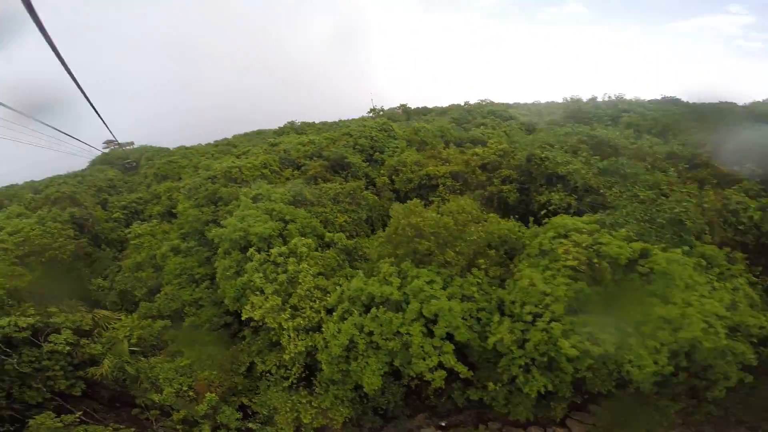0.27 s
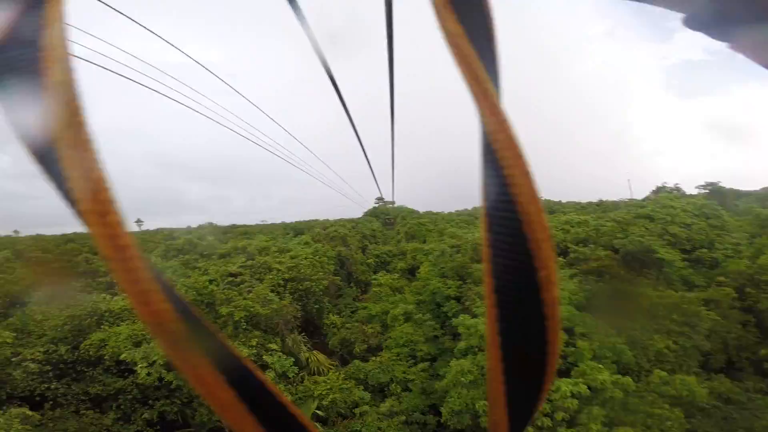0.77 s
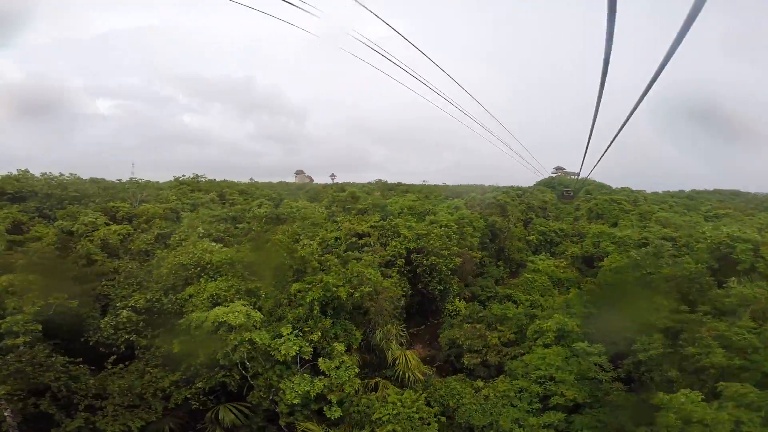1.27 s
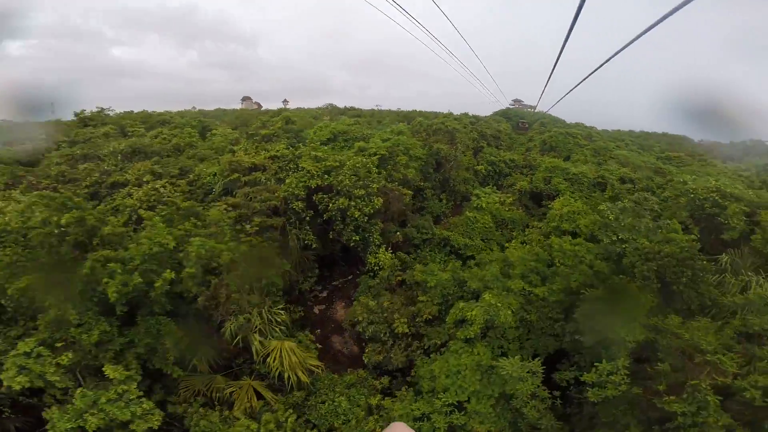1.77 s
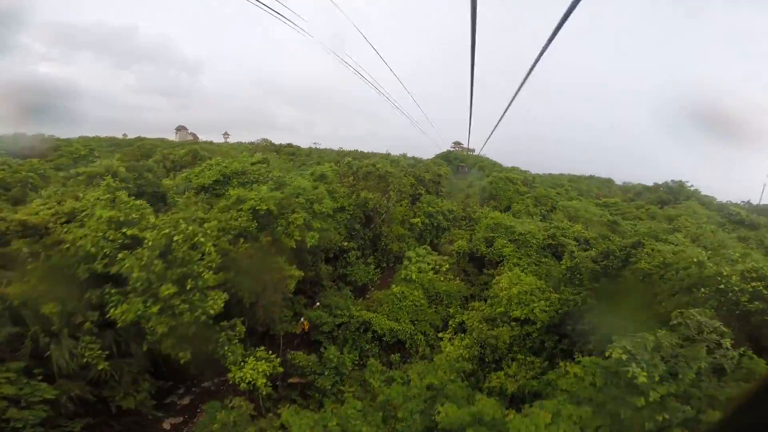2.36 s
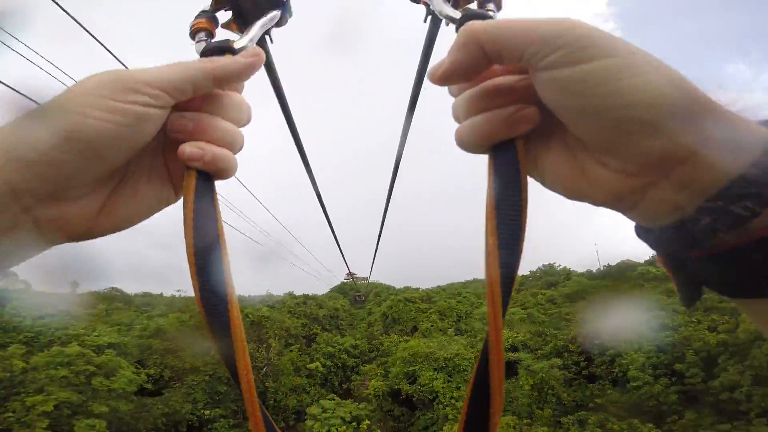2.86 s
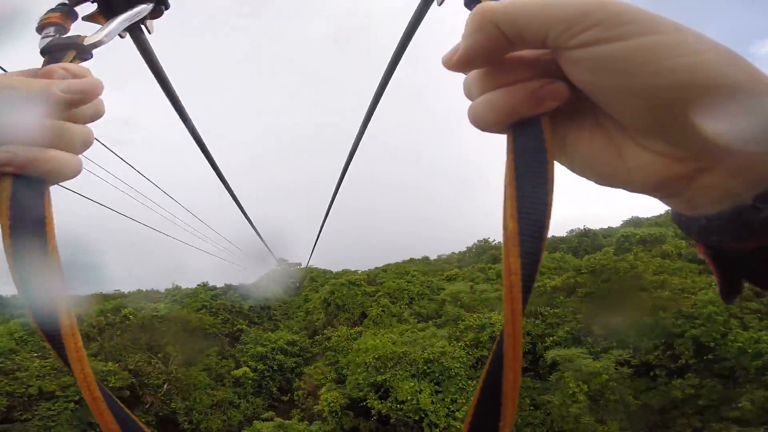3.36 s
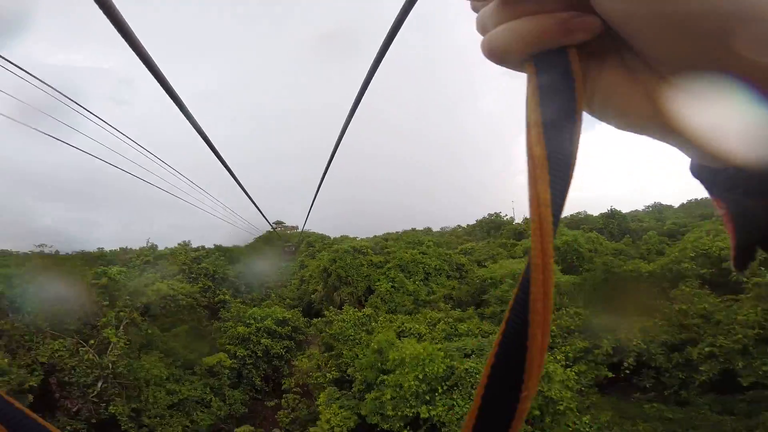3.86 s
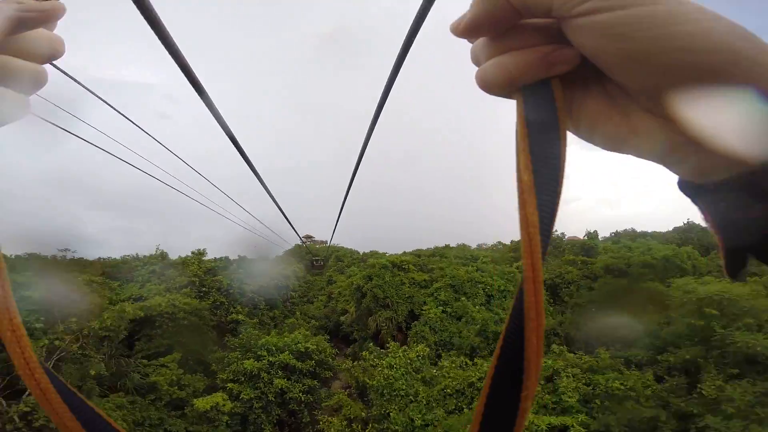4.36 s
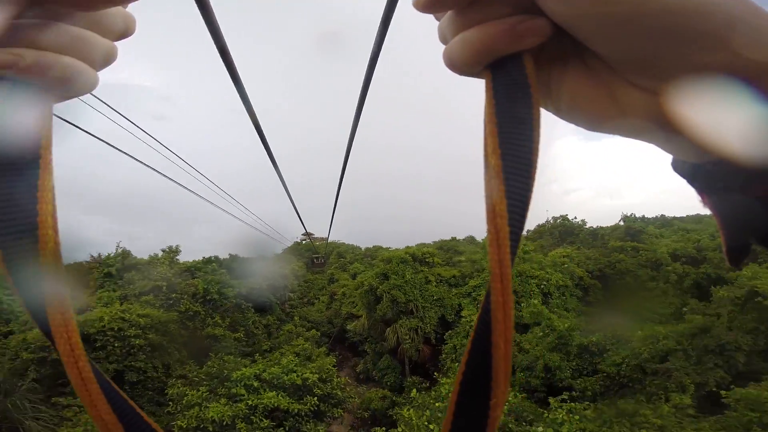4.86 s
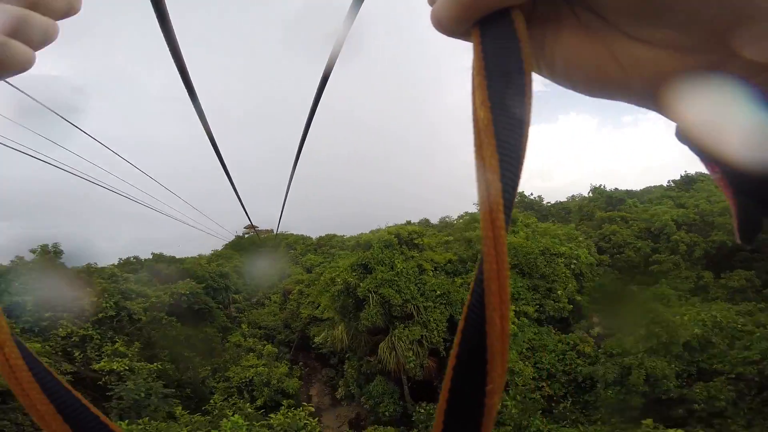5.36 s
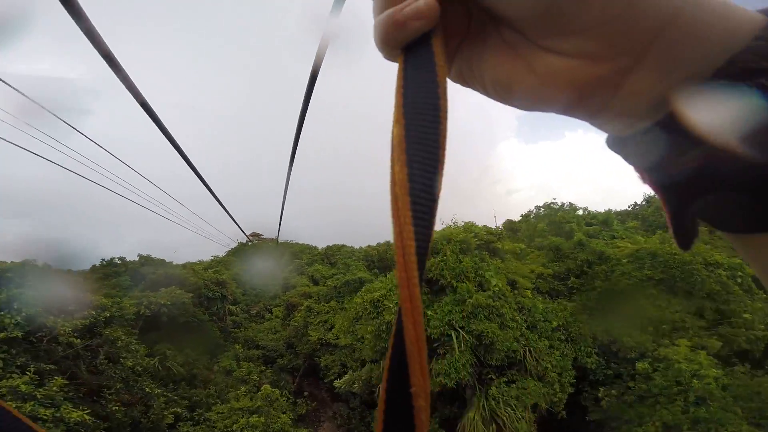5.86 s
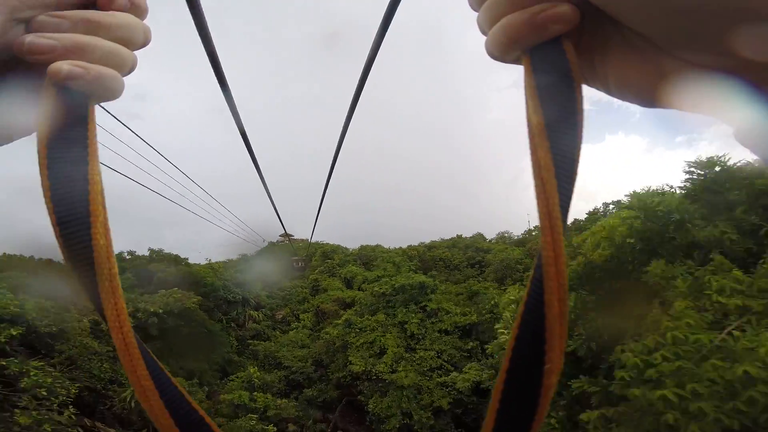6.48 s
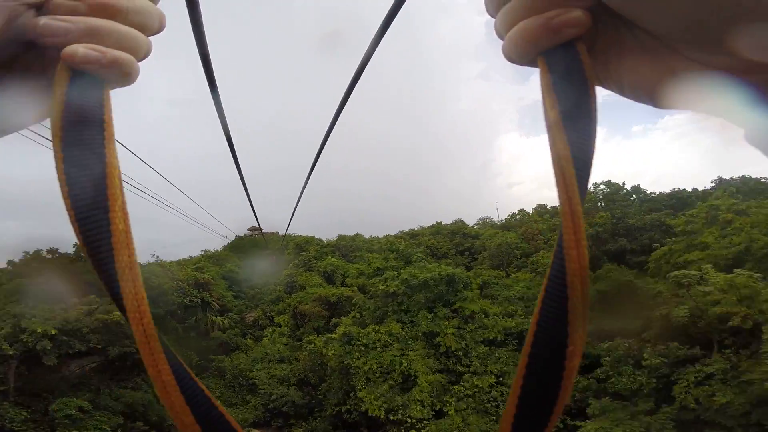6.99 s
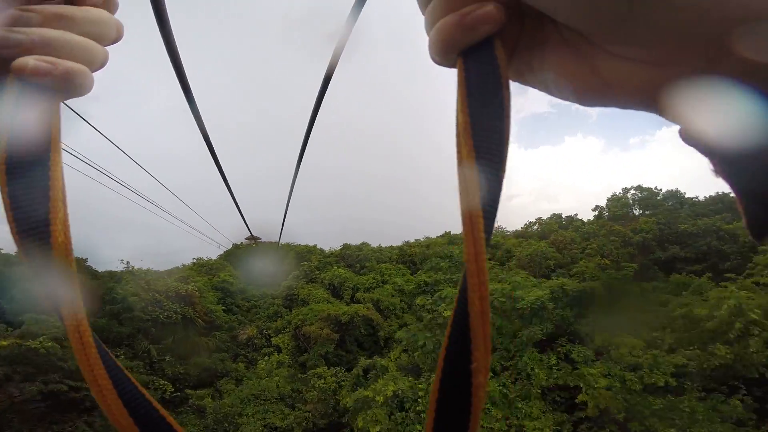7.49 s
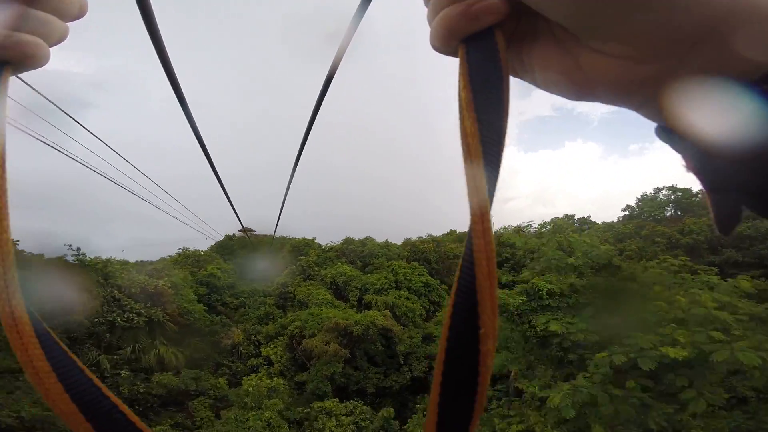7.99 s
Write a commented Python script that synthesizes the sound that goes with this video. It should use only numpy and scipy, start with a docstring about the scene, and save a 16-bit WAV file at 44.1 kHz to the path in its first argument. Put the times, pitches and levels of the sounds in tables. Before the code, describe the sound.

A zip line trolley whines and hisses steadily along a steel cable, its pitch slowly sinking, with soft wind gusts and one strap knock early on.

```python
"""High on a zip line: a trolley runs down a stranded steel cable, heard from a camera on the rider, and slows.
The sheaves hum over the strands, two bearing whistles sing as partials, and filtered noise through steel
resonances makes the rolling ring, hiss and sizzle; its colour changes as the rider twists.
Gusts of low buffet and airy rush reach the microphone, and a harness strap knocks against the camera once,
as short bursts of noise through the housing."""
import sys
import numpy as np
from scipy import signal
from scipy.fft import rfft, irfft, next_fast_len
from scipy.io import wavfile
from scipy.ndimage import uniform_filter1d, minimum_filter1d

SR = 44100
rng = np.random.default_rng(int(sys.argv[2]) if len(sys.argv) > 2 else 0)


def waveform_to_disk(signal):
    """Save audio, clipped to [-1, 1], as 16-bit WAV at the path in sys.argv[1]."""
    frames = np.transpose(np.atleast_2d(signal))
    scaled = np.clip(frames, -1, 1) * 32767
    samples = np.round(scaled).astype(np.int16)
    wavfile.write(sys.argv[1], SR, samples)


N = 362502
TIME = np.arange(N) / SR  # s
SIZE = next_fast_len(N + 8192, real=True)  # transform length, with room for filter tails
FREQ = np.arange(SIZE // 2 + 1) * SR / SIZE  # Hz


def undb(db):
    """Decibels to gain."""
    return 10 ** (np.asarray(db) / 20)


def unit(x):
    """Scale to rms 1."""
    return x / np.sqrt(np.mean(x ** 2) + 1e-18)


def curves(table):
    """Each column of a table of timed rows, sample by sample."""
    s, *columns = np.transpose(table)
    return [np.interp(TIME, s, column) for column in columns]


def swells(table):
    """Bell-shaped changes in dB, summed over the events; one curve for each dB column."""
    total = 0
    for s, half, *rises in table:
        bell = np.exp(-((TIME - s) / half) ** 2)
        total = total + np.outer(rises, bell)
    return total


def walk(rate):
    """Smooth random wander with spread 1, from steps drawn at the given rate per s."""
    k = max(int(SR / rate), 1)
    steps = np.repeat(rng.standard_normal(N // k + 1), k)
    smooth = uniform_filter1d(uniform_filter1d(steps, k), k)
    return unit(smooth[:N])


def shape(x, gain):
    """Causal (minimum-phase) filter with the given gain at every frequency."""
    cepstrum = irfft(np.log(gain + 1e-6), SIZE)
    # fold the cepstrum forward in time so nothing sounds before its cause
    cepstrum[1:SIZE // 2] *= 2
    cepstrum[SIZE // 2 + 1:] = 0
    response = np.exp(rfft(cepstrum))
    return irfft(rfft(x, SIZE) * response, SIZE)[:N]


def colour(points):
    """Gain through (f/Hz, level/dB) points, falling away above the last."""
    hz, db = np.transpose(points)
    curve_db = np.interp(np.log(FREQ + 1), np.log(hz), db)
    return undb(curve_db) / (1 + (FREQ / hz[-1]) ** 4)


def resonances(modes):
    """Gain of a body with steep (f/Hz, width/Hz, level/dB) resonances, summed as power."""
    power = 0
    for hz, width, db in modes:
        power = power + (undb(db) / (1 + (2 * (FREQ - hz) / width) ** 2)) ** 2
    return np.sqrt(power)


def band_rms(x, lo_hz, hi_hz):
    """Level of a sound between two frequencies."""
    band = signal.butter(4, [lo_hz, hi_hz], "band", fs=SR, output="sos")
    return np.std(signal.sosfilt(band, x))


# the trolley's pace as it slows
# [t/s, f/Hz at which the sheaves cross the cable strands]
STRAND_RATE = [(0.0, 667), (1.3, 671.7), (2.4, 656.8), (3.4, 646), (4.1, 636.0), (5.2, 627.3), (6.4, 609),
               (7.3, 589), (8.22, 574.2)]


def strand_rate(wobble=0.0017):
    """Rolling speed over strand spacing sets the crossing rate, with a slight random wobble."""
    return curves(STRAND_RATE)[0] * (1 + wobble * walk(12))


def contact(strand_phase, grit_db, flutter_db, flutter_rate, strand_db):
    """Countless tiny steel-on-steel impacts; the load flutters and pulses with the given phase."""
    load_db = grit_db * walk(900) + flutter_db * walk(flutter_rate)
    load_db = load_db + strand_db * np.sin(strand_phase)
    return unit(rng.standard_normal(N) * undb(load_db))


# the rider's twist
# [t/s, side: 0 sideways, 1 twisted away, 2 ahead]
TWIST = [(0, 0), (.84, 0), (1.0, 1), (2.45, 1), (3.05, 2), (8.22, 2)]


def ring(drive, modes, lo_hz, hi_hz):
    """The contact rings a group of resonances; the twist blends three sides, each levelled in the given band."""
    side, = curves(TWIST)
    out = 0
    for index in range(3):
        heard = shape(drive, resonances(modes[:, [0, 1, 2 + index]]))
        share = np.maximum(1 - abs(side - index), 0)
        out = out + share * heard / band_rms(heard, lo_hz, hi_hz)
    return out


# steel resonances and their strength from each side
# [f/Hz, width/Hz, level/dB sideways, level/dB twisted away, level/dB ahead]
TROLLEY = [(1258, 206, -31, -38, -27.5), (1547, 184, -18, -23, -17.5), (1700, 240, -17.5, -20.5, -19),
           (1893, 81, -16.5, -17, -16), (2520, 1000, -24.5, -22, -23.5), (2679, 196, -13, -36.5, -12.5),
           (3010, 260, -8.5, -8, -8), (3160, 72, -26, -6.5, -7.5), (3473, 142, 0.5, 0.5, 1.5),
           (3665, 232, -3.5, 1, 0), (4380, 38, 0.5, -5, -42), (4680, 650, -10, -10.5, -13),
           (5280, 260, -11, -8, -12.5), (5630, 330, -4, -3, -10), (6062, 340, -3, -10, -4.5),
           (6302, 454, 2, -4.5, -4), (6940, 66, -21, -8, -4), (7017, 164, -16, -32, -8),
           (7414, 760, -12.5, -13, -17), (8560, 1040, -26, -31, -23), (9580, 1400, -32, -26.5, -26.5),
           (10390, 480, -23.5, -26, -19.5), (12100, 1600, -48, -52, -33), (12820, 2400, -33, -36.5, -28)]
# the load on the sheaves surges and locks them into a tone
# [t/s at the peak, half length/s, ring level change/dB, tone level change/dB]
SURGES = [(.22, 0.12, 2.5, 1), (.75, 0.29, 0, 3), (1.45, 0.22, -0.5, 11.5), (1.97, .09, -1, 12.5),
          (2.39, 0.085, 2, 9.5), (2.9, 0.49, 1.5, 3), (5.35, 0.19, 1.5, 8.5), (7.25, .45, 2, 6),
          (8.05, .2, 0.5, 6)]
# the cable hiss and the sizzle on top
# [t/s, hiss level/dB, sizzle level/dB]
HISS = [(0.0, -18.5, -37), (0.36, -18.5, -41), (0.71, -15, -37), (0.89, -18.5, -40), (0.94, -27, -41),
        (1.26, -23, -38.5), (2.06, -21.5, -38.5), (2.2, -22.5, -37.5), (2.4, -19, -35.5), (2.58, -23, -42),
        (2.81, -22.5, -34.5), (3.75, -17.5, -36.5), (4.62, -18.5, -38), (4.69, -17.5, -36),
        (5.26, -20, -39.5), (6.02, -20, -37.5), (6.07, -16, -36), (6.43, -19.5, -39.5), (6.82, -20, -37.5),
        (7.67, -21, -40.5), (7.9, -20, -37), (8.22, -19, -39)]
RING_DB = -19  # sheave ring between surges
JOSTLE_DB, JOSTLE_RATE = .5, 16  # the uneven cable jostles the trolley: spread in dB, changes per s


def rolling(strand_phase, top_hz=13300):
    """The sheaves ring low, the cable and side plates hiss above, and the finest contacts sizzle on top."""
    hiss_db, sizzle_db = curves(HISS)
    ring_db = RING_DB + swells(SURGES)[0]
    modes = np.array(TROLLEY, float)
    low, high = modes[:, 0] < 4100, modes[:, 0] > 8500
    # the ring also throbs faintly, at a quarter of the strand rate
    sheave_drive = contact(strand_phase / 4, grit_db=-0.44, flutter_db=0.5, flutter_rate=70, strand_db=-1.0)
    cable_drive = contact(strand_phase, grit_db=0.7, flutter_db=0.38, flutter_rate=120, strand_db=-2.1)
    fine_drive = contact(strand_phase, grit_db=1.06, flutter_db=0.6, flutter_rate=100, strand_db=-1.5)
    # the sizzle falls away steeply above top_hz
    fine_drive = shape(fine_drive, 1 / (1 + (FREQ / top_hz) ** 10))
    sheaves = ring(sheave_drive, modes[low], 2500, 4100)
    hiss = ring(cable_drive, modes[~low & ~high], 5200, 8000)
    sizzle = ring(fine_drive, modes[high], 8500, 14500)
    jostle = undb(JOSTLE_DB * walk(JOSTLE_RATE))
    return jostle * (sheaves * undb(ring_db) + hiss * undb(hiss_db) + sizzle * undb(sizzle_db))


def tone(hz, db, waver_db, blur, waver_rate=40, blur_rate=70):
    """A partial whose strength and phase (blur, in radians) tremble at random."""
    phase = 2 * np.pi * np.cumsum(hz) / SR
    level = np.sqrt(2) * undb(db + waver_db * walk(waver_rate))
    return level * np.sin(phase + blur * walk(blur_rate))


def singing(hz, db, coupling=0.73):
    """A partial that swells whenever it glides through a resonance of the trolley, heard from ahead."""
    steel = resonances(np.array(TROLLEY, float)[:, [0, 1, 4]])
    swell_db = coupling * 20 * np.log10(np.interp(hz, FREQ, steel))
    return tone(hz, db + swell_db, waver_db=3.0, blur=0.47)


# strand hum from each side, one row per harmonic
# [level/dB sideways, level/dB twisted away, level/dB ahead]
HUM = [(-59, -66.5, -64.5), (-44.5, -58, -44), (-48.5, -50, -39)]
# the hum swells and drops out
# [t/s at the peak, half length/s, level change/dB of harmonic 1, of harmonic 2, of harmonic 3]
HUM_SWELLS = [(.1, 0.34, 11, 1.5, 6), (1.848, 0.35, 15.5, -3, 2), (2.65, 0.25, 7, 8, 3),
              (5.65, 0.37, -3, 0.5, -3), (6.6, 0.14, 2, -2, -11), (6.99, 0.064, 0, -14, -4)]


def hum(strand_hz, front_hz, fade_db=1.66, fade_rate=6):
    """Strand-rate harmonics, 1 and 3 at the front sheave's rate; the lowest three fade and turn with the twist."""
    side, = curves(TWIST)
    out = singing(4 * strand_hz, db=-32) + singing(5 * strand_hz, db=-31)  # before the resonances
    for k, (sides, swell_db) in enumerate(zip(HUM, swells(HUM_SWELLS))):
        sheave_hz = strand_hz if k % 2 else front_hz
        db = np.interp(side, np.arange(len(sides)), sides) + swell_db + fade_db * walk(fade_rate)
        out = out + tone((k + 1) * sheave_hz, db, waver_db=2.5, blur=0.44)
    return out


# the bearing squeals up, or dips where the change is negative
# [t/s at the peak, half length/s, level change/dB]
SQUEALS = [(2.15, 0.31, 7), (3.1, 0.55, 9.5), (3.8, 0.47, 10), (4.35, .14, 9.5), (4.75, .12, -2),
           (5.7, 0.3, 4)]
FIRST_RATIO, SECOND_RATIO = 7.37, 5.55  # whistle pitch over strand rate: first on the front sheave
FIRST_DB, FIRST_FADE_DB_PER_S = -36.5, .5  # the first whistle weakens steadily
NEAR_DB, FAR_DB = -25.5, -30  # its two lower sidebands, before the resonances
SECOND_DB, UPPER_DB, UPPER_RISE_DB_PER_S = -31.5, -30, .5  # second whistle; its upper sideband grows
LOCK_HZ, LOCK_WIDTH_HZ = 3610, 250  # partials within this band lock to the sheave ring


def whistles(strand_hz, front_hz, wobble=.0035, second_wobble=.003):
    """Two bearing whistles with sidebands at strand-rate spacing; surges lift those within the sheave ring."""
    first_hz = FIRST_RATIO * front_hz * (1 + wobble * walk(14))
    second_hz = SECOND_RATIO * strand_hz * (1 + second_wobble * walk(10))
    first_db = FIRST_DB - FIRST_FADE_DB_PER_S * TIME + swells(SQUEALS)[0]
    out = tone(first_hz, first_db, waver_db=2.0, blur=0.97)
    surge_db = swells(SURGES)[1]
    partials = [(first_hz - strand_hz, NEAR_DB),
                (first_hz - 2 * strand_hz, FAR_DB),
                (second_hz, SECOND_DB),
                (second_hz + strand_hz, UPPER_DB + UPPER_RISE_DB_PER_S * TIME)]
    for hz, db in partials:
        locked = np.exp(-((hz - LOCK_HZ) / LOCK_WIDTH_HZ) ** 4)
        out = out + singing(hz, db + locked * surge_db)
    return out


# spectrum of the wind in the camera housing
# [f/Hz, relative level/dB]
BUFFET = [(20, -15), (33, -12), (52, 0), (70, -4), (90, -1), (115, -7.5), (148, -11.5), (179, -2.5),
          (212, -12.5), (255, -6.5), (320, -19), (450, -24.5), (900, -52)]
# spectrum of the air rushing round the housing
# [f/Hz, relative level/dB]
RUSH = [(150, -17), (330, 0), (450, 0), (550, -4.5), (650, -0.5), (780, -6.5), (950, -10.5), (1300, 0.5),
        (2500, -47)]
# gusts at the microphone
# [t/s at the peak, half length/s, level rise/dB]
GUSTS = [(.25, 1, 7.5), (2.1, 0.57, 7), (3.15, 0.61, 10.5), (4.65, 0.61, 4), (6.25, 0.31, 6),
         (6.85, 0.51, 5.5), (7.9, 0.65, 4)]
BUFFET_DB, RUSH_DB, RUSH_GROWTH = -39, -54, 0.99  # between gusts; dB of rush gained per dB of gust


def wind(eddy_db=1.0, eddy_rate=14):
    """Eddies shake the camera housing and air rushes round it; both rise with each gust."""
    gust_db = swells(GUSTS)[0] + eddy_db * walk(eddy_rate)
    buffet = unit(shape(rng.standard_normal(N), colour(BUFFET)))
    rush = unit(shape(rng.standard_normal(N), colour(RUSH)))
    return buffet * undb(BUFFET_DB + gust_db) + rush * undb(RUSH_DB + RUSH_GROWTH * gust_db)


# the hand passes between trolley and camera and hollows the hiss
# [t/s, depth 0-1]
SHADOW = [(1.4, 0), (1.65, 0.83), (2.25, .85), (2.5, 0.05), (2.8, 0.2), (3.05, 0.33), (3.35, 0.08)]


def shadowed(x, notch_hz=5290, notch_width_hz=480, lift_hz=7500, lift_width_hz=700, lift=0.74):
    """The path round the hand cancels one band and strengthens a higher one."""
    depth, = curves(SHADOW)
    cancelled = signal.lfilter(*signal.iirpeak(notch_hz, notch_hz / notch_width_hz, fs=SR), x)
    raised = signal.lfilter(*signal.iirpeak(lift_hz, lift_hz / lift_width_hz, fs=SR), x)
    return x + depth * (lift * raised - cancelled)


# touches of the strap on the camera, before the lifts in strap()
# [t/s, time scale/s, thud level/dB, scrape level/dB]
KNOCKS = [(2.319, 0.0017, -60, -25), (2.458, 0.0062, -24, -23), (2.466, 0.0065, -11.5, -19),
          (2.479, 0.0058, -16, -17)]
# camera housing modes: the first four thud, the rest scrape
# [f/Hz, width/Hz, relative level/dB]
HOUSING = [(80, 43, 11), (220, 300, 2), (480, 120, -5), (644, 130, 0), (1150, 550, -6), (1590, 620, -1),
           (2190, 580, 4.5)]


def strap(thud_lift_db=1, scrape_lift_db=3.0):
    """The strap catches and slips on the housing: its push thuds in the low modes, its weave scrapes the high ones."""
    push, rub = np.zeros(N), np.zeros(N)
    for s, length, thud_db, scrape_db in KNOCKS:
        age = np.maximum(TIME - s, 0) / length
        touch = 2 * np.sqrt(age) * np.exp(-age ** 2)  # quick onset, soft release
        push += undb(thud_db + thud_lift_db) * touch
        rub += undb(scrape_db + scrape_lift_db) * touch
    thud = shape(push * rng.standard_normal(N), unit(resonances(HOUSING[:4])))
    scrape = shape(rub * rng.standard_normal(N), unit(resonances(HOUSING[4:])))
    return thud + scrape


FRONT_LEAD, FRONT_SETTLE_S = .026, .45  # the front sheave starts this fraction fast and settles


def scene():
    """The speed drives the hum, the whistles and the rolling; wind and strap act on the camera itself."""
    strand_hz = strand_rate()
    front_hz = strand_hz * (1 + FRONT_LEAD * np.exp(-TIME / FRONT_SETTLE_S))
    strand_phase = 2 * np.pi * np.cumsum(strand_hz) / SR
    trolley = shadowed(rolling(strand_phase))
    trolley = trolley + hum(strand_hz, front_hz) + whistles(strand_hz, front_hz)
    return (trolley + wind() + strap())[None]


def record(dry, ceiling=.85, ease=221, top_hz=15100):
    """The camera's limiter eases down round the loudest peaks (ease in samples), and the top is cut."""
    needed = ceiling / np.maximum(abs(dry), ceiling)
    gain = uniform_filter1d(minimum_filter1d(needed, size=ease), size=ease)
    top_cut = signal.ellip(12, .1, 100, top_hz, fs=SR, output="sos")
    return signal.sosfilt(top_cut, dry * gain)


dry = scene()
out = record(dry)
waveform_to_disk(out)
```